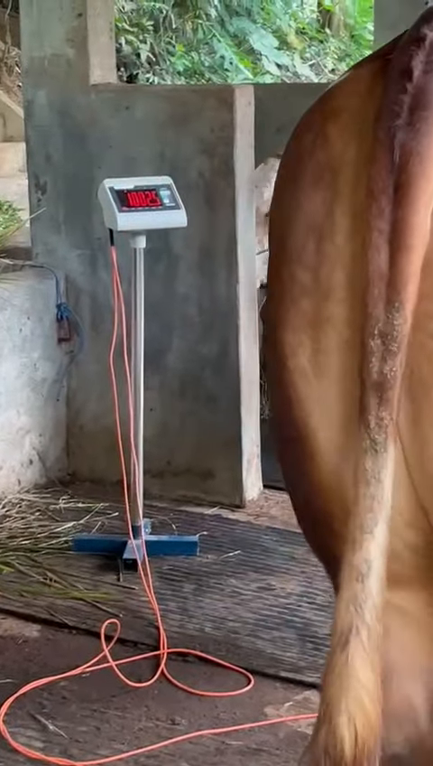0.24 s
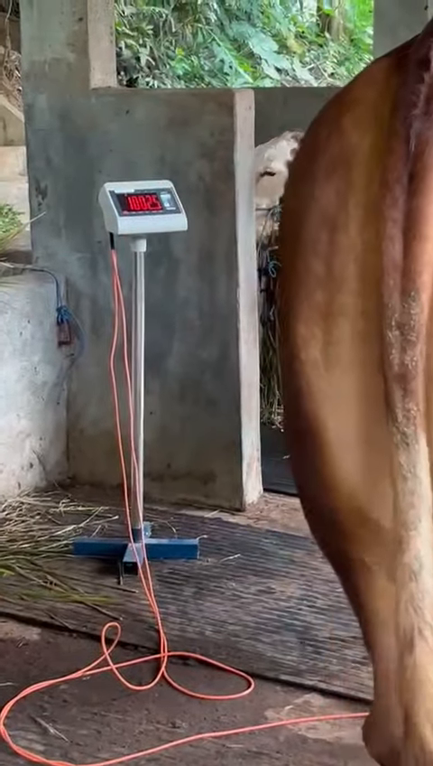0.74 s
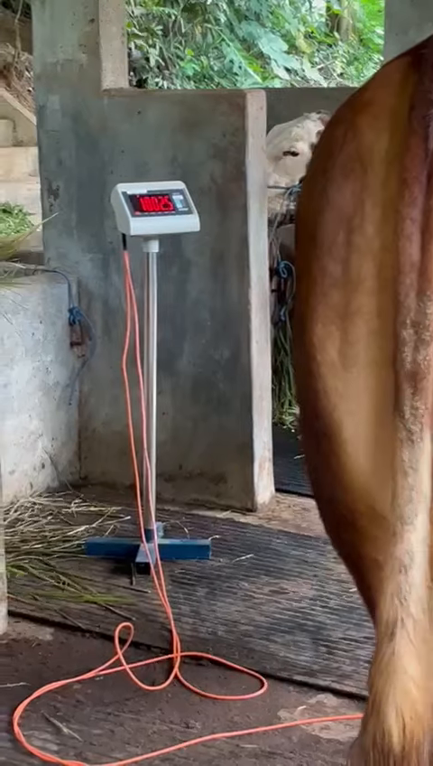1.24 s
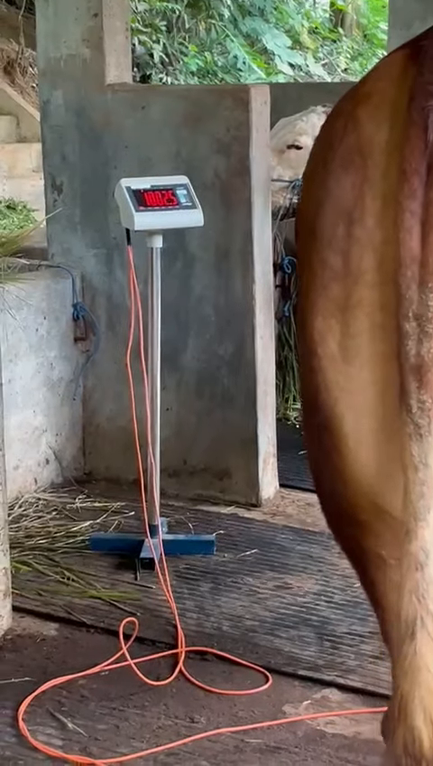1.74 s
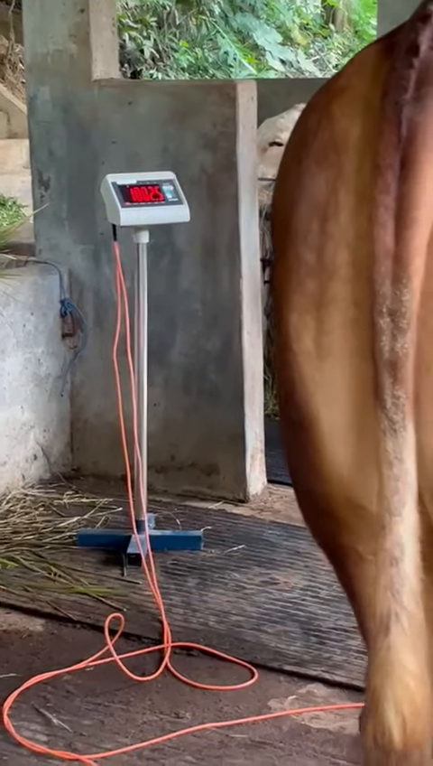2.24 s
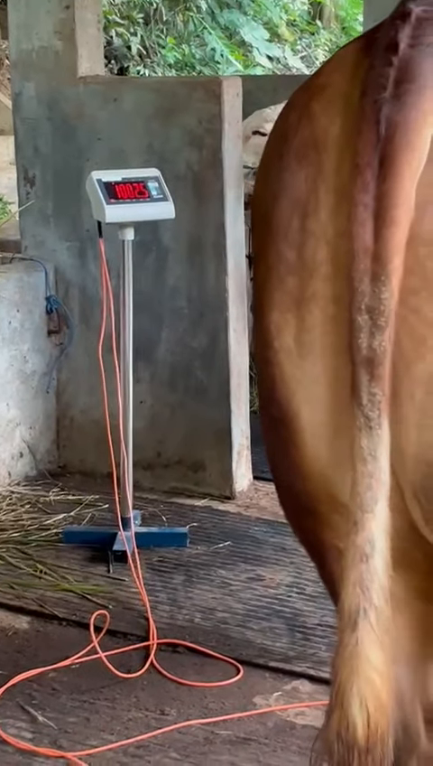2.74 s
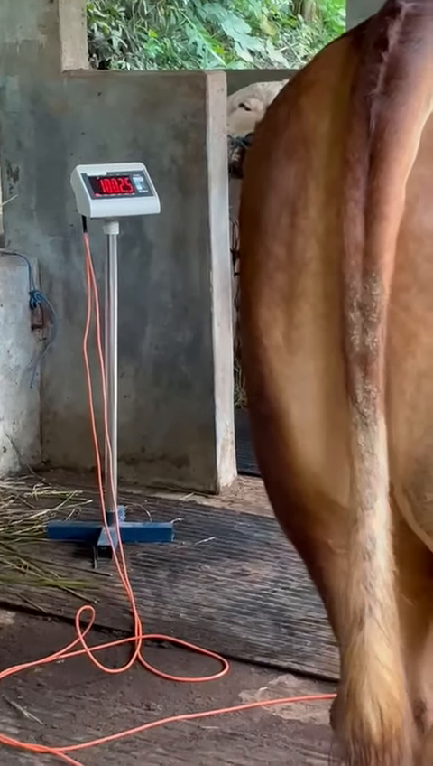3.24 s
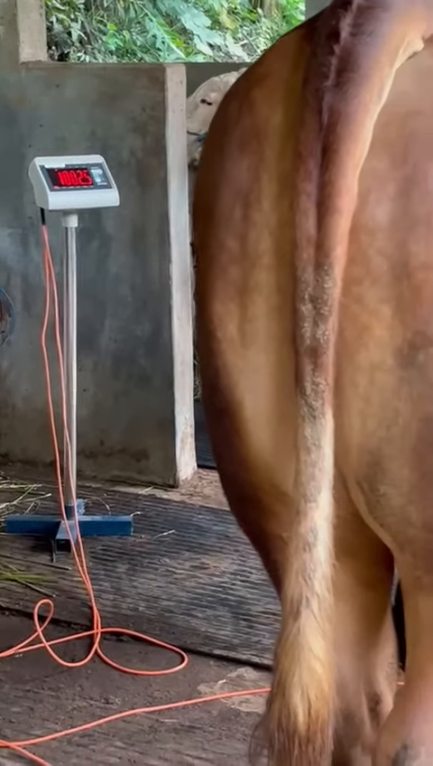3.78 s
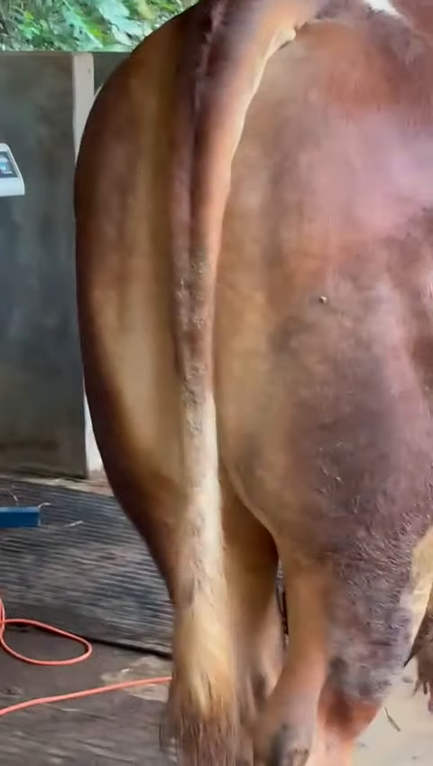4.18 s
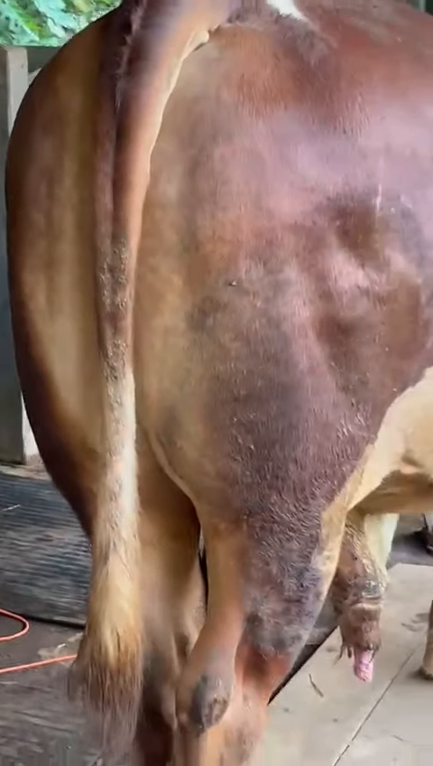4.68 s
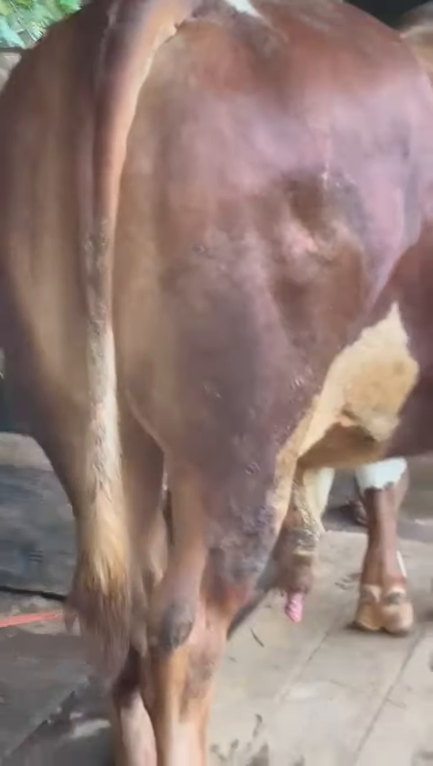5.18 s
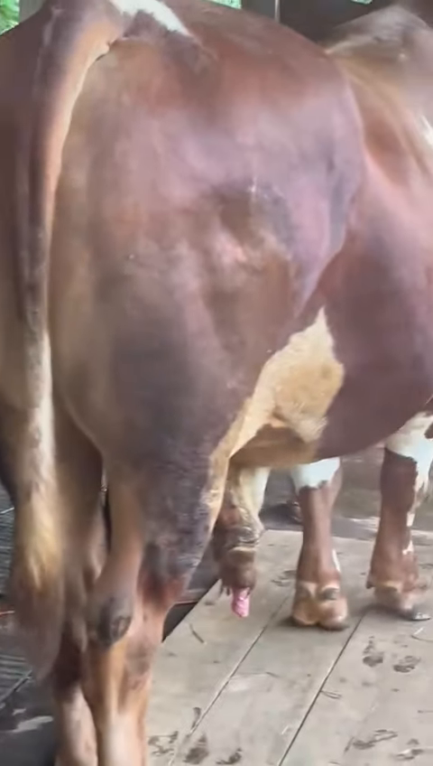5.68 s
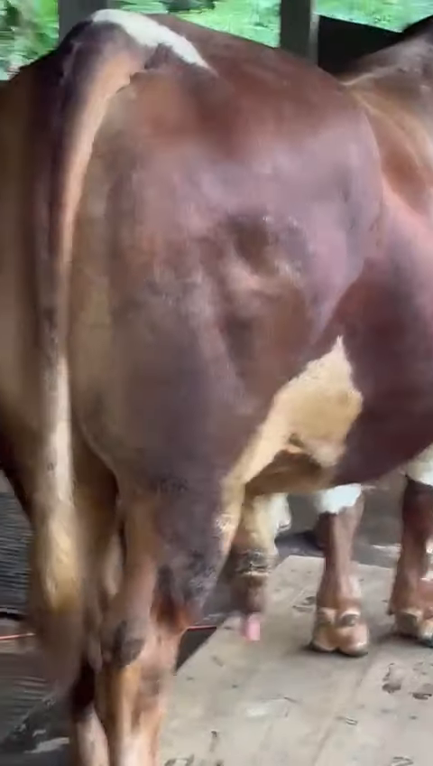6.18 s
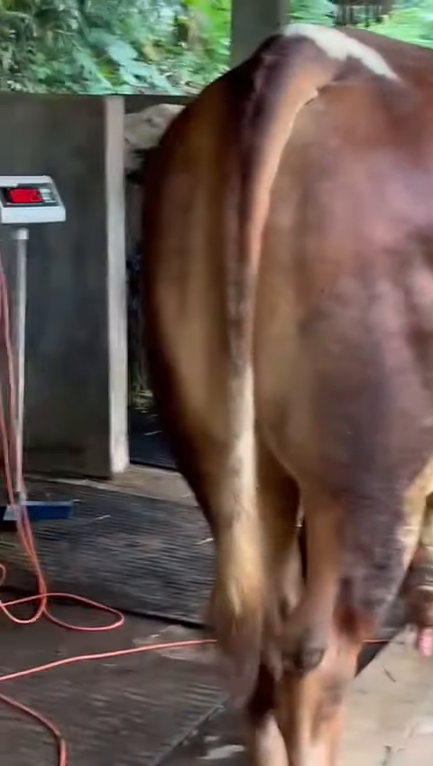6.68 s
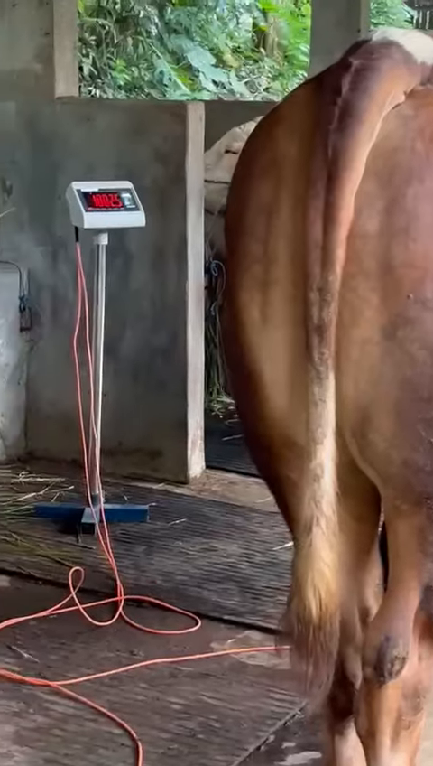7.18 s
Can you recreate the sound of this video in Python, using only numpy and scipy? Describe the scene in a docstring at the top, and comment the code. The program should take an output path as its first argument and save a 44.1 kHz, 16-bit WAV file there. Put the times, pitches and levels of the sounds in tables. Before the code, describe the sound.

An open concrete shed, heard by a close stereo microphone, with quiet yard hush and roughly a second of reverberation. A bull slightly left begins immediately: from 0 to 1 s a deep, nasal, closed-mouth moo rises from about 120 to 177 Hz and sinks to 104. A steel rail clinks dully at 1.15 and 1.3 s; a bird chirps in rapid falling whistles from 1.5 to 2.1 s, with a hoof thud at 1.6. From 1.9 to 3.35 s a low growl swells, breaks hoarsely to about 340 Hz and drops. The rail rings clearly at 3.55 s amid rustling fodder; a hoof thuds at 3.8 and scuffs at 4. A louder bellow runs 4.25-5.27 s, peaking near 410 Hz, then a strong hoof knock at 5.35. Another high, open bellow lasts 5.83-6.77 s. Faint thuds follow, and a rough, breathy fifth call starts at 7.24 s and is cut off.

```python
"""An open concrete cattle shed: a bull stands slightly left of a stereo pair and calls five times. The first
call is a closed-mouth moo, later ones break into hoarse, high bellows; the fifth is cut off by the end. Fold
harmonics pass a throat that shifts as the mouth opens; pulsed air noise with its own spectrum joins them, and
rough folds add the rattle. A knocked steel rail rings in decaying modes; hooves are bursts of noise; a bird
chirps in falling whistles. Faint whistles, rustling fodder and the hush of the yard lie behind, and the shed
adds its reverberation."""
import sys
import numpy as np
from scipy import signal
from scipy.fft import rfft, irfft
from scipy.io import wavfile
from scipy.ndimage import uniform_filter1d, minimum_filter1d

SR = 44100
rng = np.random.default_rng(int(sys.argv[2]) if len(sys.argv) > 2 else 0)


def dump_mix(stems):
    """Bounce the given channels to the path in sys.argv[1] as a 16-bit WAV at rate SR."""
    frames = np.atleast_2d(stems).T  # one column per channel
    limited = np.clip(frames, -1, 1)  # hard clip at full scale
    pcm = np.round(limited * 32767).astype(np.int16)
    wavfile.write(sys.argv[1], SR, pcm)


N = 327222
TIME = np.arange(N) / SR

# Hush of the yard, its spectrum. Each row: frequency in Hz, relative level per Hz in dB.
YARD_SPECTRUM = [(30, -21.5), (60, -0.5), (90, -2), (130, -6), (220, 0), (300, -13.5), (600, -14),
                 (1100, -20), (2000, -22), (2800, -36), (4500, -27.5), (6000, -54), (8000, -33),
                 (10500, -51)]
# Level of the yard. Each row: time in seconds, level in dB.
YARD_LEVEL = [(0, -41), (1.4, -48), (1.85, -49), (4.2, -47.5), (5.8, -48.5), (7.15, -67.5)]
# Stereo width of diffuse sound. Each row: frequency in Hz, level of the side over the middle in dB.
STEREO_WIDTH = [(60, -35), (170, -29.5), (350, -6.5), (750, -0.5), (1100, -9.5), (2200, -0.5), (8000, -5.5)]
# Rustling fodder, its spectrum. Each row: frequency in Hz, relative level per Hz in dB.
FODDER_SPECTRUM = [(2800, 4), (4800, 5), (6000, -23), (7800, 8.5), (9000, -4.5), (10800, -35.5)]
# Louder rustles. Each row: centre in seconds, peak in dB added to the bed, time to fall to 1/e in seconds.
FODDER_SWELLS = [(2.177, -63, 0.08), (3.538, -55.5, 0.15), (3.997, -68, 0.082), (4.359, -61, 0.12)]
FODDER_BED_DB = -75
# Faint high whistles. Each row: centre in seconds, frequency in Hz, peak in dB, time to fall to 1/e in seconds.
FAINT_WHISTLES = [(3.96, 3128, -66, .05), (4.1, 3822, -60, .2), (7.1, 3822, -70, .2)]
# Bird phrases. Each row: start in seconds, level in dB ahead of the echoes, number of notes.
BIRD_PHRASES = [(1.505, -46, 4), (1.738, -46, 3), (1.949, -44.5, 3)]
# Hoof falls. Each row: start in seconds, then the starting levels of thud, scuff and click in dB.
HOOF_FALLS = [(0.354, -30, -58, -79), (1.619, -31.5, -44.5, -59), (2.979, -34, -64.5, -58),
              (3.811, -23.5, -42.5, -80), (4.027, -93, -39, -83), (5.228, -29, -48.5, -67),
              (5.357, -20, -30, -35.5), (6.801, -41, -82, -80), (7.195, -38, -88, -72)]
# Grit under the hoof, its spectrum. Each row: frequency in Hz, relative level per Hz in dB.
SCUFF_SPECTRUM = [(100, -23.5), (400, 15), (1100, 12.5), (2200, -5), (4500, -11.5), (8500, -43)]
# Knocks on the steel rail. Each row: start in seconds, strength in dB, hardness (level change of the modes
# above 2 kHz) in dB, share of the free ringing time, delay until the lower modes are muffled in seconds,
# time for the muffling to take a further 60 dB in seconds.
RAIL_KNOCKS = [(1.148, -33.5, -14.5, 0.63, 0.047, 0.071), (1.275, -42, -38, 0.4, 0.054, 0.2),
               (1.808, -57, -47, 0.45, 0.12, 0.43), (3.56, -29, -2.5, 0.98, 0.45, 0.18)]
# Modes of the rail. Each row: frequency in Hz, level in dB, free ringing time to -60 dB in seconds.
RAIL_MODES = [(1147, 4, 1.9), (1178, -7, .35), (1240, -18, .6), (1400, -11, 0.3), (3140, -15, .6),
              (7750, -27, .3), (8371, -34, 1.2)]
# Reverberation of the shed. Each row: frequency in Hz, time to -60 dB in seconds.
SHED_DECAY = [(100, 0.21), (350, 1.356), (900, 1.2), (2000, 0.93), (5000, 1.7), (10000, 0.66)]
# Standing waves of the stall. Each row: frequency in Hz, level over the direct sound in dB.
STALL_RESONANCES = [(228, -5.5), (269, 4), (380, 3.5), (430, 1), (836, -2.5), (866, 4.5), (1008, 1.5),
                    (1042, -4), (1534, 3.5), (1960, 4), (2205, 5.5)]
STALL_WIDTH_HZ = 18.2

# Throat response, mouth closed. Each row: frequency in Hz, gain in dB.
CLOSED_THROAT = [(90, -4.5), (150, 23), (240, 10.5), (350, 0), (420, -10), (530, -25), (710, -18.5),
                 (800, -10.5), (880, -19.5), (960, -26), (1050, -15.5), (1130, -15.5), (1230, -21.5),
                 (1400, -0.5), (1590, -10.5), (1760, -32.5), (1900, -17.5), (2110, -18.5), (2700, -45.5),
                 (3000, -32.5), (3700, -41.5)]
# Throat response, mouth wide open. Each row: frequency in Hz, gain in dB.
OPEN_THROAT = [(90, -11.5), (170, 4.5), (260, 9), (400, -5.5), (540, 0.5), (680, -17.5), (810, 0.5),
               (990, -6), (1110, -11.5), (1210, -20.5), (1400, -10), (1630, -14), (1780, -17),
               (1990, -11.5), (2420, -24), (2680, -59.5), (2880, -26), (3050, -38), (3250, -36)]
# Air rushing through the folds, its spectrum. Each row: frequency in Hz, relative level per Hz in dB.
RASP_SPECTRUM = [(130, -44.5), (240, -21.5), (430, 8), (600, -6.5), (830, 5), (1020, 3), (1150, 4.5),
                 (1400, 1.5), (1750, 2), (2050, -2.5), (2450, -12.5), (2700, -38.5)]
# Breath hiss above the rasp, its spectrum. Each row: frequency in Hz, relative level per Hz in dB.
HISS_SPECTRUM = [(2650, -29), (3050, 2), (3800, 0.5), (5000, 6), (5900, -44), (7000, 2), (8000, 0),
                 (9200, -1.5), (10500, -39.5)]
# Vocal fold rate, one arch a call. Each row: time in seconds, rate in Hz ahead of the jitter.
PITCH_ARCHES = [
    [(0, 119.4), (.09, 136.1), (.14, 146.2), (.2, 163.1), (.24, 172.7), (.4, 177.3), (.535, 176),
     (.58, 163.9), (.67, 136.7), (.72, 129.8), (.8, 122.9), (.85, 111.6), (.97, 103.6)],
    [(1.92, 79.6), (2.1, 104.8), (2.21, 129.3), (2.28, 110.1), (2.38, 123.2), (2.46, 141.1), (2.52, 166.5),
     (2.61, 182.2), (2.75, 191), (2.86, 201.9), (2.92, 243.6), (2.97, 319), (3.05, 334.9), (3.11, 346),
     (3.15, 330.6), (3.2, 327.2), (3.235, 294), (3.28, 184.7), (3.35, 128.3)],
    [(4.24, 81.1), (4.45, 121), (4.53, 164.6), (4.6, 214.7), (4.625, 250), (4.645, 315.2), (4.7, 334.1),
     (4.774, 360.4), (4.85, 380.3), (4.92, 403), (4.98, 398.9), (5.06, 409.6), (5.1, 388.6), (5.15, 327.7),
     (5.195, 265), (5.23, 160.5), (5.27, 109.6)],
    [(5.83, 122.5), (5.97, 232.1), (6.02, 349.4), (6.06, 371.5), (6.13, 387.4), (6.21, 397.6), (6.28, 410),
     (6.5, 403.4), (6.545, 418.2), (6.61, 406.4), (6.675, 377), (6.705, 243.2), (6.77, 130.4)],
    [(7.24, 122.2), (7.32, 188.9), (7.38, 230.4), (7.45, 222)],
]
# Effort, one curve a call. Each row: time in seconds, levels of the chest and the mouth resonance in dB,
# ahead of the waver and of the bull's place in the mix.
EFFORT_CURVES = [
    [(0.0, -7.5, -32), (0.018, -19.5, -35.5), (0.094, -9, -35), (0.228, -14, -24), (0.302, -10, -31.5),
     (0.334, -15, -27.5), (0.544, -11.5, -27.5), (0.594, -22, -30), (0.672, -19, -44), (0.724, -17, -30.5),
     (0.756, -11.5, -43.5), (0.794, -26.5, -46), (0.85, -10.5, -46.5), (0.89, -28.5, -49),
     (0.97, -37, -45.5)],
    [(1.92, -60.5, -62), (1.99, -35.5, -63.5), (2.026, -34.5, -62), (2.082, -19.5, -48), (2.178, -20, -48),
     (2.198, -23, -39), (2.386, -13, -40.5), (2.4, -18.5, -35), (2.472, -13, -36), (2.5, -20.5, -25),
     (2.592, -9.5, -28), (2.668, -5.5, -22), (2.692, -5, -35.5), (2.764, -17.5, -23), (2.792, -8, -29),
     (2.804, -14, -25), (2.902, -20.5, -28), (3.042, -29.5, -16), (3.15, -25.5, -23), (3.162, -23.5, -12.5),
     (3.274, -14.5, -23.5), (3.298, -19.5, -32), (3.35, -31, -34)],
    [(4.24, -58, -55.5), (4.36, -36.5, -32.5), (4.42, -24, -35), (4.53, -19.5, -32.5), (4.6, -15.5, -24),
     (4.7, -33.5, -22), (4.75, -25, -16), (4.785, -10, -17), (4.86, -9, -13.5), (4.92, -18, -9.5),
     (4.95, -21, -18), (5.0, -19, -12.5), (5.08, -15.5, -20.5), (5.15, -23, -18.5), (5.19, -20, -23.5),
     (5.235, -18.5, -26), (5.27, -33, -46)],
    [(5.83, -83.5, -70), (5.856, -37, -43), (5.904, -25, -31), (5.96, -21.5, -27.5), (6.06, -23, -25.5),
     (6.104, -29.5, -20), (6.17, -33.5, -12.5), (6.23, -21, -11), (6.26, -30.5, -29), (6.31, -42.5, -6),
     (6.345, -26.5, -17.5), (6.44, -32.5, -12.5), (6.525, -21, -15.5), (6.545, -25, -16), (6.6, -23, -16.5),
     (6.665, -19.5, -17.5), (6.73, -24.5, -29), (6.77, -25, -46)],
    [(7.24, -49, -62), (7.284, -38.5, -40), (7.396, -18.5, -31.5), (7.41, -21, -30.5)],
]
# Colour, one row a call. Each row: brightness in dB, air noise in dB.
CALL_COLOURS = [(-2, -3), (-4, -0.5), (-4, 0), (-5.5, 8), (-2, 16)]
# The folds beat cleanly on held notes and rattle when slack or changing register, one curve a call.
# Each row: time in seconds, roughness from 0 to 1.
ROUGHNESS_CURVES = [
    [(0, .05), (.1, .03), (.52, .02), (.58, .08), (.7, .03), (.9, .1), (1.02, .3)],
    [(1.92, .3), (2.1, .1), (2.25, .2), (2.45, .1), (2.55, .03), (2.77, .03), (2.85, .35), (2.95, .55),
     (3.03, .2), (3.12, .45), (3.18, .12), (3.28, .14), (3.38, .4)],
    [(4.24, .5), (4.45, .32), (4.6, .35), (4.7, .33), (4.79, .1), (4.9, .16), (5.02, .27), (5.29, .45)],
    [(5.83, .6), (6, .42), (6.08, .12), (6.15, .03), (6.45, .045), (6.62, .11), (6.8, .45)],
    [(7.24, .5), (7.45, .4)],
]
# Weight of the fundamental among the partials. Each row: time in seconds, gain in dB.
FUNDAMENTAL_WEIGHT = [(0, -6), (.12, -29), (.45, -34), (.65, -12), (.85, -13), (2.1, -3.5), (2.2, -5),
                      (2.36, -16), (2.54, -9.5), (2.62, -29.5), (2.7, -35.5), (2.79, 6), (2.98, -8),
                      (3.12, -27.5), (3.2, -8.5), (4.55, -13), (4.7, -22.5), (4.8, 11), (5.2, -4.5),
                      (6.1, -9), (6.6, -5), (7.3, 0)]
# The 1.5 kHz resonance against the 2 kHz one. Each row: time in seconds, level difference in dB.
UPPER_RESONANCE_BALANCE = [(.2, 8.5), (.46, -4.5), (.7, 5), (2.3, 1), (2.54, 2.5), (2.65, -5.5),
                           (2.76, 3.5), (3.2, -4), (4.4, -2), (4.75, -2), (4.92, 0.5), (5.9, -11),
                           (6.15, -1), (6.24, 1), (6.33, 9.5), (6.45, -3), (6.55, -4.5), (7.35, -3.5)]
# Chest, mouth and two upper resonances. Each row: low edge in Hz, high edge in Hz, levelling window in seconds.
RESONANCE_BANDS = [(85, 560, .035), (560, 1300, .035), (1300, 1780, .06), (1780, 4500, .06)]
# Air noise over the tone, one value in dB for each resonance, for full roughness at the register break,
# ahead of the call's own air noise.
RASP_OVER_TONE = [-4.5, 0.5, 7, 10]

BREAK_HZ = 272   # between the low and the high register
RASP_DB_PER_OCTAVE, RASP_FOLLOWS = 0.5, 0.79   # growth with pitch, exponent on roughness
WAVER_HZ, WAVER_DB = 23.7, 4   # waver of each resonance when fully rough
# upper resonances: level, share of the mouth's swing, change when wide open
EDGE_DB, EDGE_FOLLOWS, EDGE_OPEN_DB = -13, 0.82, -1
# mouth resonance over the chest with the lips closed; its rise to wide open
CLOSED_DB, OPENING_SPAN_DB = -14.5, 6.5
ATTACK_S, RELEASE_S = 0.011, 0.0095


def from_db(db):
    """Decibels to gain."""
    return 10 ** (np.asarray(db) / 20)


def rms_one(x):
    """Scale to unit power."""
    return x / np.sqrt(np.mean(x ** 2) + 1e-20)


def in_time(rows, t):
    """Each column of a curve at the times t."""
    s, *columns = np.transpose(rows)
    return [np.interp(t, s, column) for column in columns]


def at_hz(points, hz):
    """Read a table on a log-frequency axis."""
    f, value = np.transpose(points)
    return np.interp(np.log(np.maximum(hz, 1)), np.log(f), value)


def response(points, hz):
    """Gain of a spectrum table, falling 30 dB an octave past its ends."""
    nearest = np.clip(hz, points[0][0], points[-1][0])
    octaves_outside = np.abs(np.log2(np.maximum(hz, 1) / nearest))
    return from_db(at_hz(points, hz) - 30 * octaves_outside)


def noise(points, size):
    """Unit-power noise with the given spectrum."""
    hz = np.fft.rfftfreq(size, 1 / SR)
    white = rfft(rng.standard_normal(size))
    return rms_one(irfft(white * response(points, hz), size))


def diffuse(points, size):
    """Noise from all around, nearly alike at both microphones in the bass."""
    hz = np.fft.rfftfreq(size, 1 / SR)
    side = irfft(rfft(noise(points, size)) * from_db(at_hz(STEREO_WIDTH, hz)), size)
    return noise(points, size) + side * [[1], [-1]]


def band(x, low_hz, high_hz):
    """Steep band-pass without delay."""
    return signal.sosfiltfilt(signal.butter(4, [low_hz, high_hz], "band", fs=SR, output="sos"), x)


def wobble(rate_hz, size):
    """Random motion of spread 1, low-passed at the given rate."""
    lowpass = signal.butter(2, rate_hz, fs=SR, output="sos")
    slow = signal.sosfilt(lowpass, rng.standard_normal(size + SR // 4))
    return rms_one(slow[-size:])   # without the filter's run-in


def evened(x, window_s):
    """Hold the short-time power at 1."""
    power = uniform_filter1d(x ** 2, int(window_s * SR))
    return x / np.sqrt(np.maximum(power, 0) + 1e-12)


def swell(centre_s, peak_db, half_s):
    """Bell-shaped rise and fall of level."""
    return from_db(peak_db) * np.exp(-((TIME - centre_s) / half_s) ** 2)


def add(out, s, x):
    """Mix x in at time s."""
    i = max(0, round(s * SR))
    out[..., i:i + x.shape[-1]] += x[..., :max(0, N - i)]


def yard():
    """Hush of the yard: diffuse noise whose level drifts."""
    level_db, = in_time(YARD_LEVEL, TIME)
    return from_db(level_db) * diffuse(YARD_SPECTRUM, N)


def fodder(flicker_db=2.0):
    """Fodder rustles underfoot: faint, flickering diffuse noise, now and then louder."""
    level = from_db(FODDER_BED_DB) + sum(swell(*row) for row in FODDER_SWELLS)
    return level * from_db(flicker_db * wobble(37, N)) * diffuse(FODDER_SPECTRUM, N)


def shed(x):
    """Diffuse reverberation of the shed: bands of noise, each dying at its own rate."""
    t, tail = TIME[:SR], 0
    white = diffuse([(40, 0), (14000, 0.018)], len(t))
    edges = np.geomspace(50, 12800, 9)
    for low, high in zip(edges, edges[1:]):
        t60 = at_hz(SHED_DECAY, np.sqrt(low * high))
        tail = tail + band(white, low, high) * from_db(-60 * t / t60)
    onset = np.clip((t - .005) / 0.016, 0, 1)
    tail *= onset * (1 + 6 * np.exp(-t / 0.054))   # strong early echoes
    tail /= np.linalg.norm(tail.mean(0))
    return signal.fftconvolve(x[None], tail, axes=1)[:, :N]


def stall(x, echo_db, t60):
    """Nearby walls scatter the sound into dense echoes that die away quickly."""
    t = TIME[:SR // 4]
    echoes = rng.standard_normal(len(t)) * from_db(-60 * t / t60) * (t > .004)
    echoes /= np.linalg.norm(echoes)
    return x + from_db(echo_db) * signal.fftconvolve(x, echoes)[:len(x)]


def stall_ring(x):
    """Standing waves between the stall walls ring on whenever the voice touches them."""
    out = x.copy()
    for hz, db in STALL_RESONANCES:
        b, a = signal.iirpeak(hz, hz / STALL_WIDTH_HZ, fs=SR)
        out += from_db(db) * signal.lfilter(b, a, x)
    return out


def whistles():
    """Thin, steady sine tones swell and fade."""
    out = np.zeros(N)
    for s, hz, db, half_s in FAINT_WHISTLES:
        out += swell(s, db, half_s) * np.sin(2 * np.pi * hz * TIME)
    return out


def bird(top_hz=5020, bottom_hz=4150, note_s=.042, spacing_s=.033):
    """Quick runs of falling whistles, slightly buzzy from random pitch motion, with close echoes."""
    out, t = np.zeros(N), np.arange(0, note_s, 1 / SR)
    envelope = np.sqrt(np.hanning(len(t)))
    for s, level_db, notes in BIRD_PHRASES:
        for k in range(round(notes)):
            hz = np.linspace(top_hz, bottom_hz, len(t)) * (1 + 0.035 * wobble(500, len(t)))
            whistle = np.sin(2 * np.pi * np.cumsum(hz) / SR)
            add(out, s + k * spacing_s, from_db(level_db) * envelope * whistle)
    return stall(out, echo_db=-2, t60=.25)


def hooves(thud_t60=.18, scuff_t60=.33, click_t60=.05):
    """A hoof gives a dull thud on the floor and a gritty scuff; on bare concrete it also clicks."""
    out, t = np.zeros(N), TIME[:SR // 2]
    for s, thud_db, scuff_db, click_db in HOOF_FALLS:
        thud = evened(noise([(70, -5.5), (105, -0.5), (160, -8.5)], len(t)), 0.47)
        thud *= from_db(thud_db - 60 * t / thud_t60)
        scuff = noise(SCUFF_SPECTRUM, len(t)) * from_db(scuff_db - 60 * t / scuff_t60)
        click = noise([(1000, 1.5), (4000, 0.5), (11000, -18.5)], len(t))
        click *= from_db(click_db - 60 * t / click_t60)
        add(out, s, (thud + scuff) * np.minimum(t / 0.011, 1) + click)
    return out


def rail(rise_s=0.028):
    """Knocks ring the rail's modes; hard contact favours the upper, renewed contact muffles the lower."""
    out, t = np.zeros(N), TIME[:SR * 3 // 2]
    for s, level_db, hard_db, free, muffled_s, muffled_t60 in RAIL_KNOCKS:
        muffle_db = -60 * np.maximum(t - muffled_s, 0) / muffled_t60
        for hz, mode_db, t60 in RAIL_MODES:
            decay = from_db(-60 * t / (t60 * free))
            ring = np.sin(2 * np.pi * hz * (t + s)) * decay * np.minimum(t / rise_s, 1)
            contact_db = hard_db if hz > 2000 else muffle_db
            add(out, s, from_db(level_db + mode_db + contact_db) * ring)
    return out


def partials(t, pitch, phase, opening, wander_db=3.0, count=32):
    """The harmonics of the folds, weighted by a throat that is between closed and wide open."""
    slow = slice(None, None, 64)   # the throat is worked out at every 64th sample
    wide = opening[slow]
    fundamental_db, = in_time(FUNDAMENTAL_WEIGHT, t)
    out = np.zeros(len(t))
    for k in range(1, count + 1):
        hz = k * pitch[slow]
        # from the third up, each partial swells and fades by itself
        wander = from_db(wander_db * wobble(7, len(t))[slow] * (k > 2))
        throat = response(CLOSED_THROAT, hz) ** (1 - wide) * response(OPEN_THROAT, hz) ** wide
        gain = np.interp(t, t[slow], wander * throat)
        if k == 1:
            gain = gain * from_db(fundamental_db)
        # the sound comes round the walls, so each partial arrives in its own phase
        detour = rng.uniform(0, 2 * np.pi)
        out += gain * np.cos(k * phase + detour)
    return out


def moo(arch, effort, colour, roughness, jitter=0.044, shimmer=0.7, doubling=0.07, hiss_db=-23.5):
    """One call: fold harmonics pass the throat, whose response shifts as the mouth opens; pulsed air noise with
    its own spectrum joins them."""
    t = np.arange(arch[0][0], arch[-1][0], 1 / SR)
    size = len(t)
    bright_db, airy_db = colour
    pitch, = in_time(arch, t)
    balance_db, = in_time(UPPER_RESONANCE_BALANCE, t)
    chest_db, mouth_db = in_time(effort, t)
    rough, = in_time(roughness, t)
    mouth_over_chest_db = uniform_filter1d(mouth_db - chest_db, SR // 8)
    opening = np.clip((mouth_over_chest_db - CLOSED_DB) / OPENING_SPAN_DB, 0, 1)
    edge_db = EDGE_DB + EDGE_FOLLOWS * uniform_filter1d(mouth_db, SR // 12)
    edge_db = edge_db + EDGE_OPEN_DB * opening + bright_db
    air = from_db(airy_db + RASP_DB_PER_OCTAVE * np.log2(pitch / BREAK_HZ)) * rough ** RASP_FOLLOWS

    # hoarse folds beat unevenly in both period and strength
    unsteady = 1 + jitter * rough * wobble(110, size) + 0.005 * wobble(11.5, size)
    phase = 2 * np.pi * np.cumsum(pitch * unsteady) / SR
    folds = partials(t, pitch, phase, opening) * (1 + shimmer * rough * wobble(51, size))
    folds *= 1 + doubling * rough * np.cos(phase / 2)   # strong and weak beats alternate
    puffs = rms_one(from_db(2.5 * np.cos(phase)))   # air escapes once a cycle
    tone = stall(stall_ring(evened(folds, .03)), echo_db=-9, t60=.2)
    rasp = stall_ring(puffs * noise(RASP_SPECTRUM, size))

    # the low resonance carries the hum; the upper ones come out as the mouth opens and the bull strains
    levels_db = (chest_db, mouth_db, edge_db + balance_db / 2, edge_db - balance_db / 2)
    voice = from_db(hiss_db + 0.79 * edge_db) * puffs * noise(HISS_SPECTRUM, size)
    for (low, high, steady_s), rasp_db, level_db in zip(RESONANCE_BANDS, RASP_OVER_TONE, levels_db):
        tone_part = evened(band(tone, low, high), steady_s)
        air_part = from_db(rasp_db) * air * rms_one(band(rasp, low, high))
        waver_db = WAVER_DB * np.sqrt(rough) * wobble(WAVER_HZ, size)
        voice += evened(tone_part + air_part, steady_s) * from_db(level_db + waver_db)
    fade = np.minimum((t - t[0]) / ATTACK_S, (t[-1] - t) / RELEASE_S)
    return voice * np.clip(fade, 0, 1)


def bull():
    """All the calls, one after another, each with its own pitch, effort, colour and roughness."""
    out = np.zeros(N)
    for arch, effort, colour, roughness in zip(PITCH_ARCHES, EFFORT_CURVES, CALL_COLOURS, ROUGHNESS_CURVES):
        add(out, arch[0][0], moo(arch, effort, colour, roughness))
    return out


def scene():
    """The sources stand slightly to the left, in the shed's reverberation and the hush of the yard."""
    indoors = from_db(-2.5) * bull() + rail() + hooves()
    left = indoors + bird() + whistles()
    right = np.interp(TIME - 5.2e-5, TIME, left)   # reaches the right microphone 52 microseconds later
    reverberation = from_db(-6.5) * shed(indoors)
    return np.array([left, right]) + reverberation + yard() + fodder()


def record(dry, ceiling=0.78, cutoff_hz=12200):
    """Rumble is cut, a limiter holds down the loudest peaks alike in both channels, the top is cut."""
    x = signal.sosfilt(signal.butter(2, 30, "high", fs=SR, output="sos"), dry)
    needed = np.minimum(1, ceiling / (np.abs(x).max(0) + 1e-9))
    gain = uniform_filter1d(minimum_filter1d(needed, SR // 40), SR // 40)
    return signal.sosfilt(signal.cheby2(12, 60, cutoff_hz, fs=SR, output="sos"), x * gain)


dry = scene()
out = record(dry)
dump_mix(out)
```